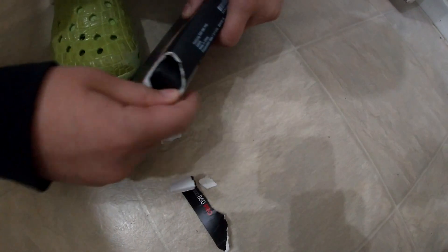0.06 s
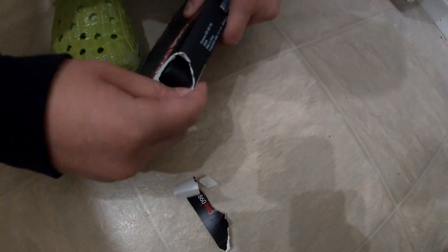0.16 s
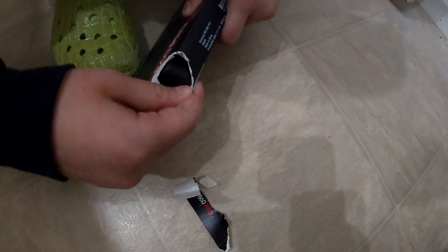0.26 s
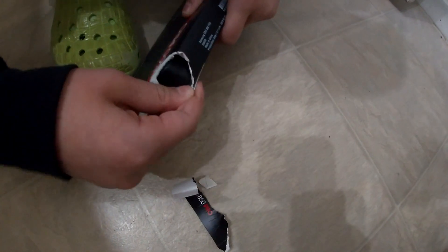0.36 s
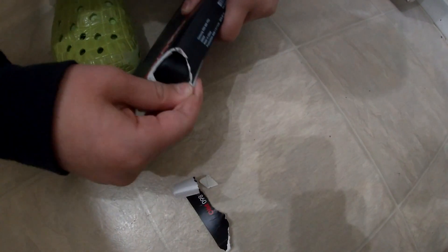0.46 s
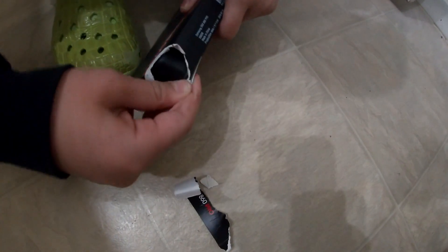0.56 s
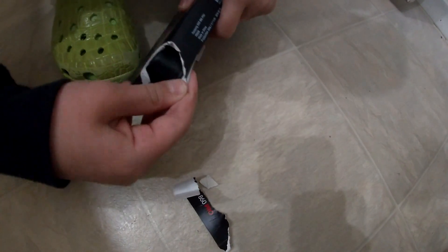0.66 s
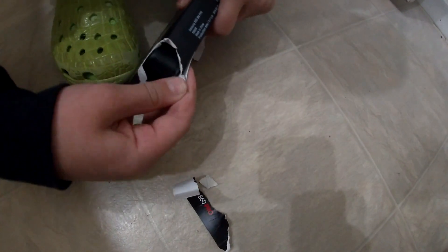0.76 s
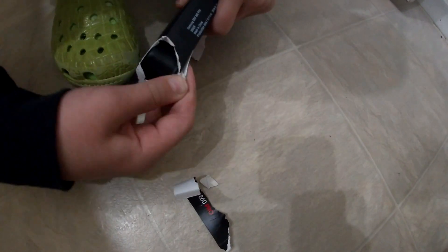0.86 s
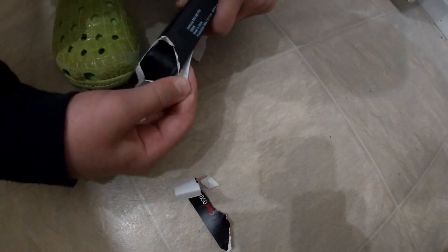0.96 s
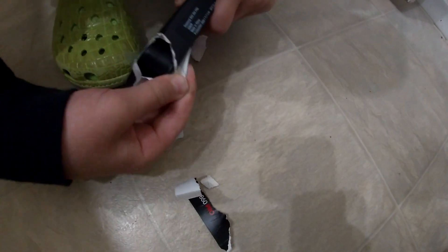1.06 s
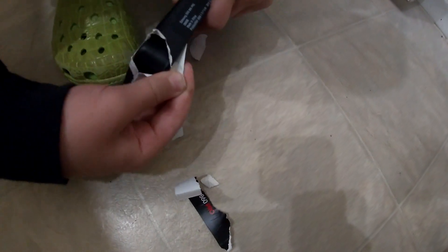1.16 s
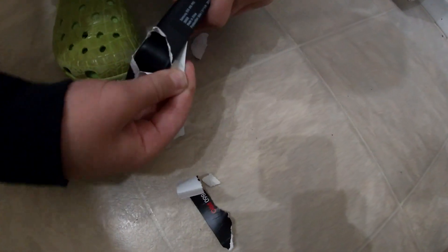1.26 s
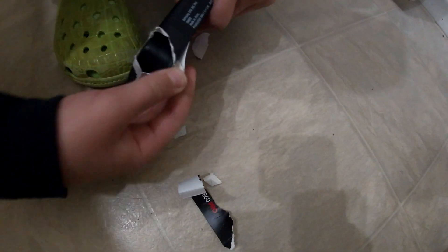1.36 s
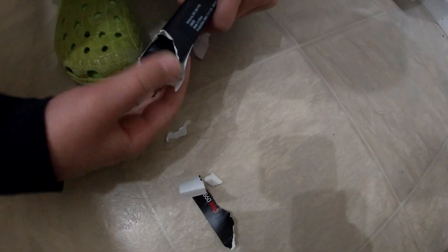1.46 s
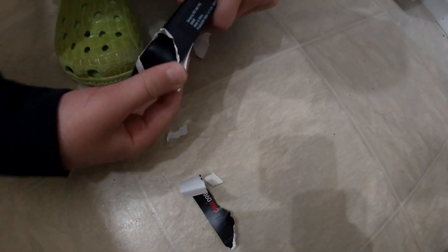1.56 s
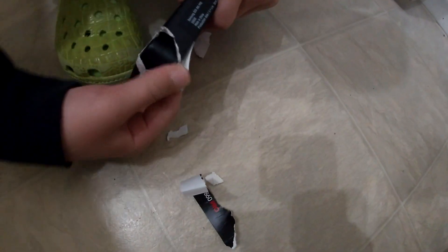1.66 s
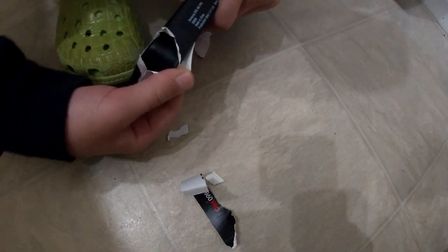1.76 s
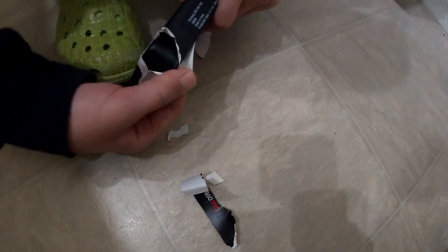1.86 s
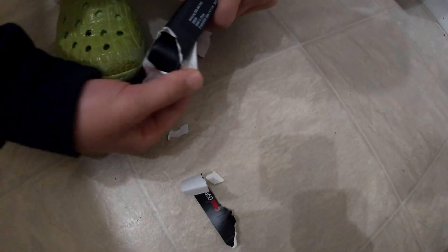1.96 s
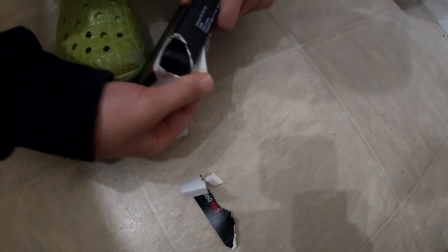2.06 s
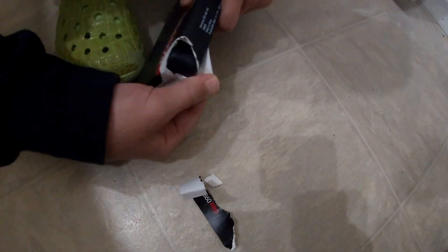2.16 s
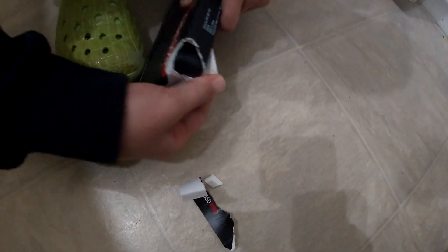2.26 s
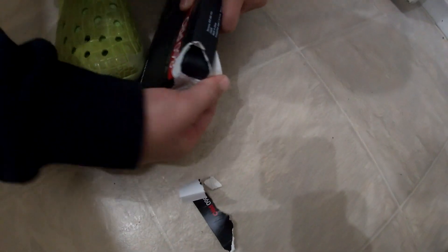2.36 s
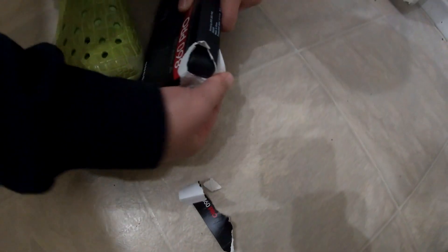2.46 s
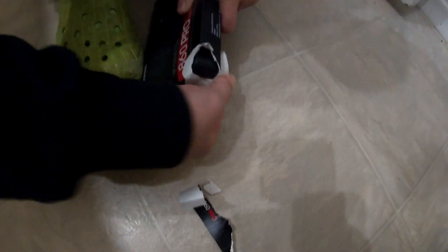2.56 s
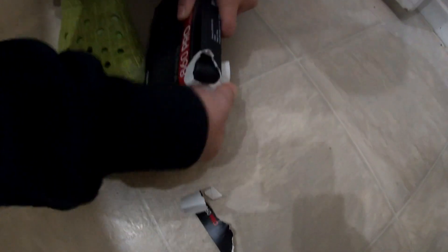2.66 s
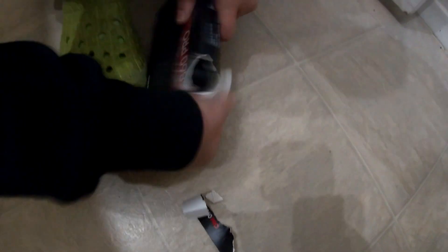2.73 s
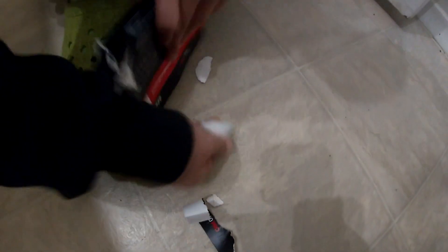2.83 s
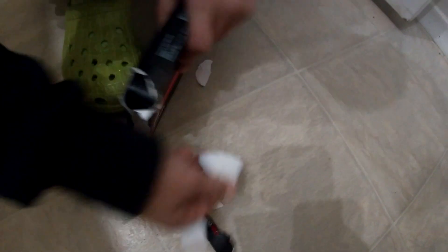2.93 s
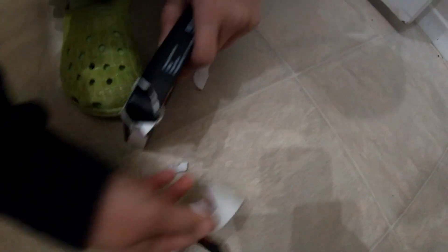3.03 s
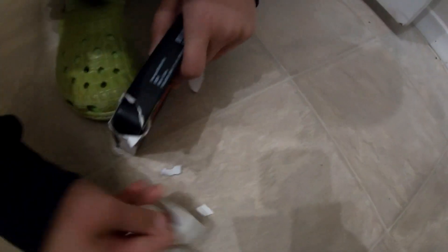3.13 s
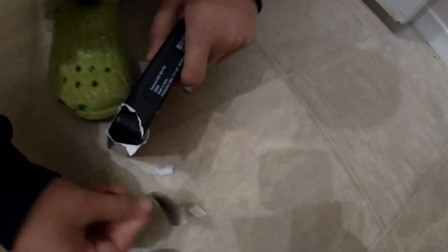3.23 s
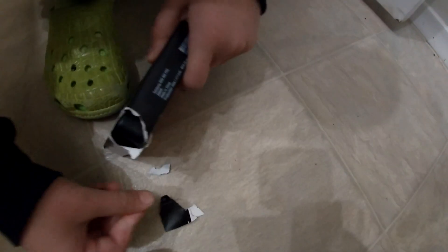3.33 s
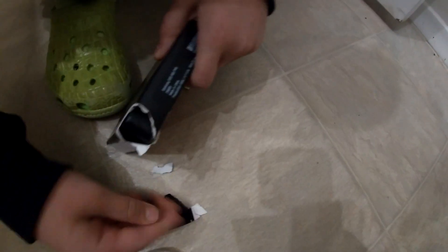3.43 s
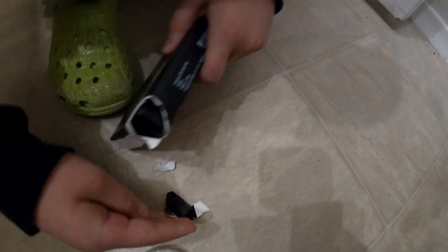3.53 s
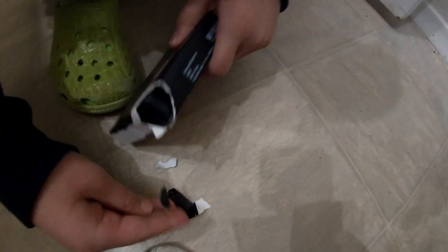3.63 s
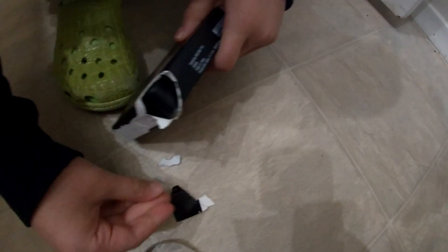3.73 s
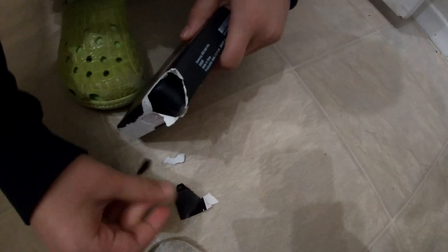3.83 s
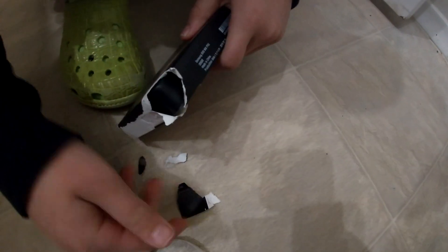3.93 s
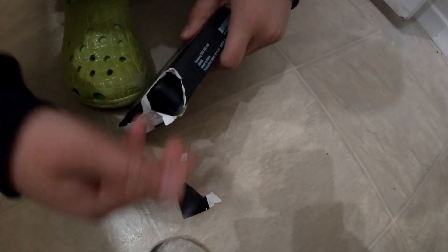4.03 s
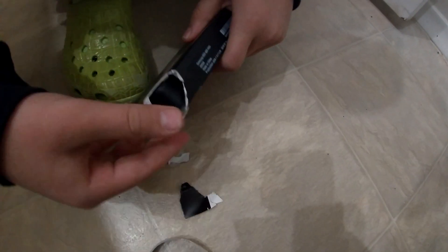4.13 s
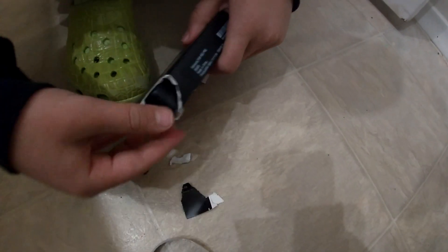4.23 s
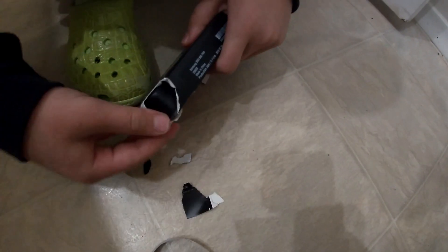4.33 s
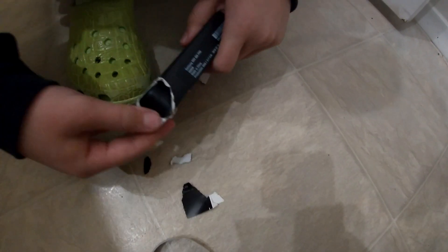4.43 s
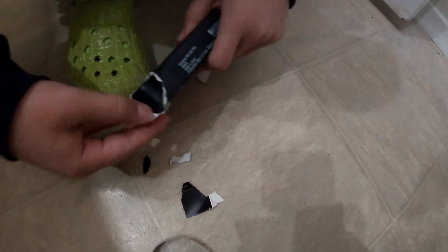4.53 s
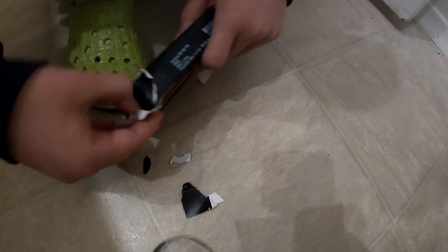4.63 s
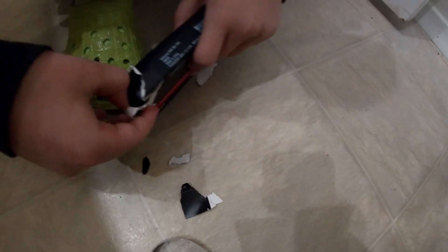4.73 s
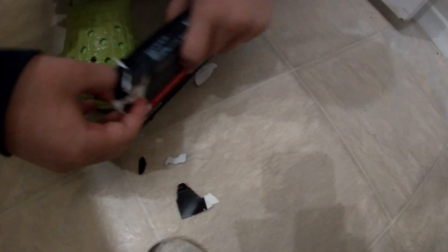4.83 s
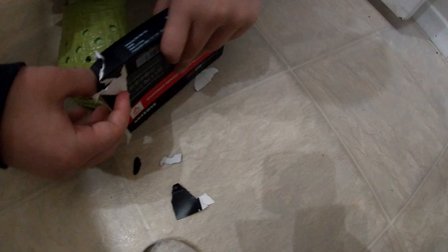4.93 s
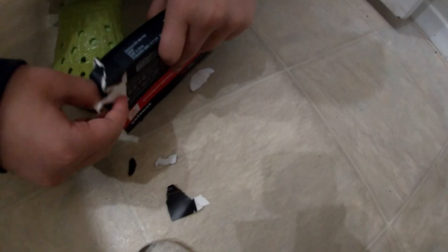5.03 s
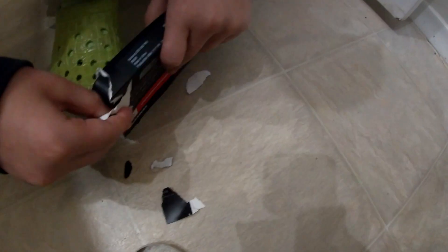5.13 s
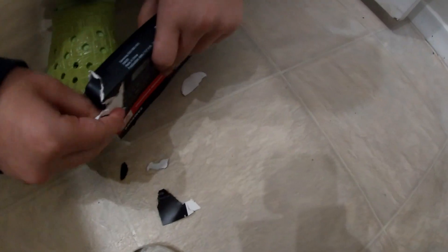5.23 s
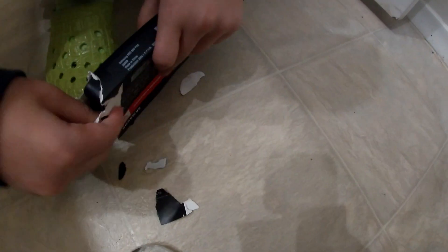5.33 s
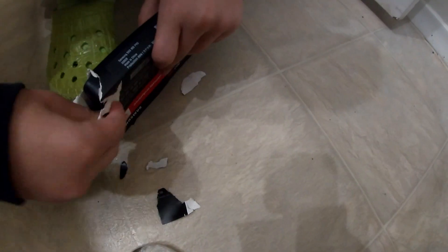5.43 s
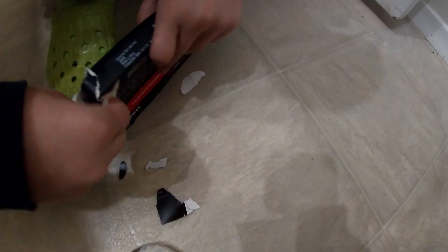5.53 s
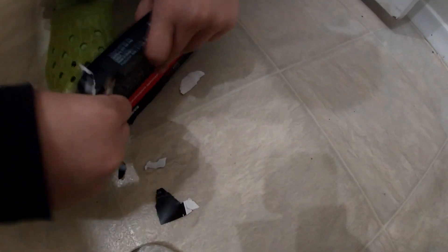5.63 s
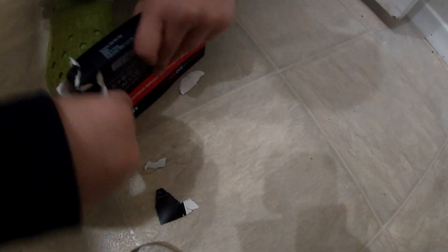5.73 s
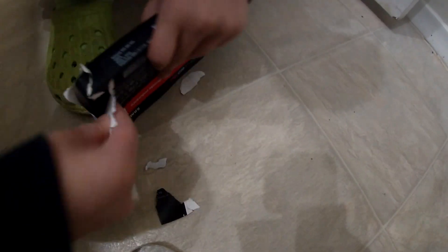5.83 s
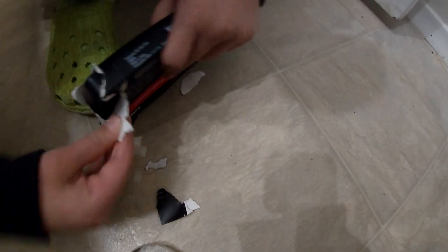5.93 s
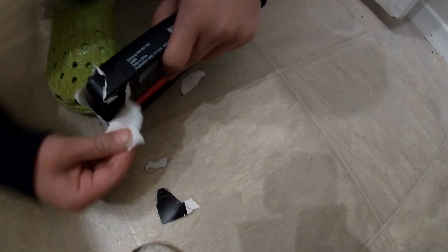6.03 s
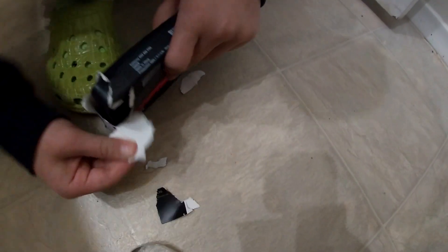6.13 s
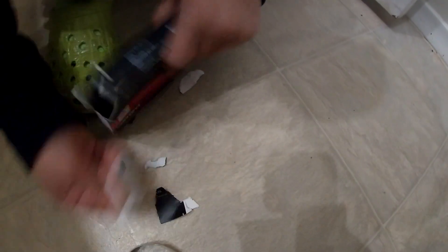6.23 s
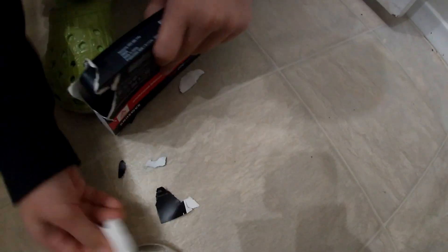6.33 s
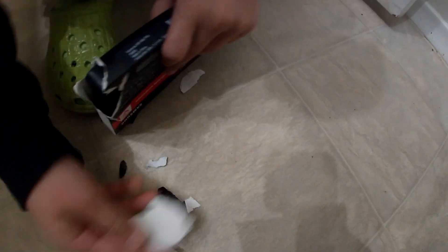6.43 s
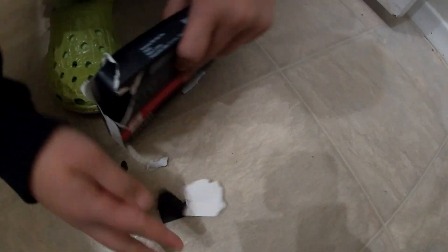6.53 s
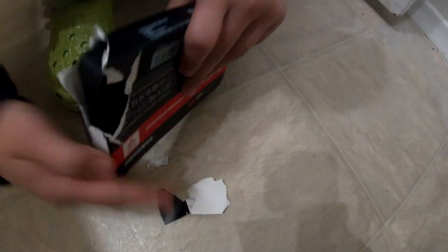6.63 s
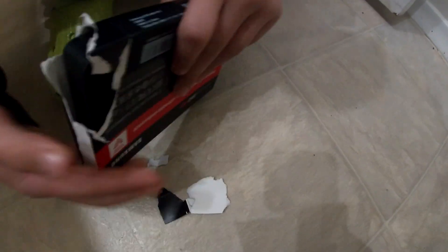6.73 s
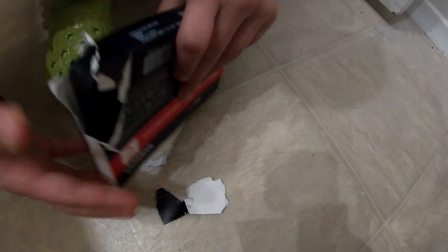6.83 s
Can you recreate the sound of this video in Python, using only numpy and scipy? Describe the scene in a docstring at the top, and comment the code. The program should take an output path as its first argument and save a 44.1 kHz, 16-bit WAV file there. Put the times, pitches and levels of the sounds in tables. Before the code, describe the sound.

Thin card is rubbed, creased, peeled and torn in uneven bursts in a small hard room, while a motor hums quietly.

```python
"""Just above the floor of a small hard room, a small cardboard box is picked open by hand.
Fingers rub the card, creases snap, strips rip, skin peels, card squeaks and scraps tap.
Random clicks, as of breaking fibres, shake the parts of the card; snaps, rips and rubbing also ring the hollow.
Squeaks are gliding tones, jolts and straining hands are low noise,
and an appliance makes two wavering hums over rumble and hiss."""
import sys
import numpy as np
from scipy import signal
from scipy.fft import rfft, irfft
from scipy.io import wavfile

SR = 44100
rng = np.random.default_rng(int(sys.argv[2]) if len(sys.argv) > 2 else 0)


def wav_record(signal):
    """Record a signal, one row per channel, as 16-bit PCM in the file named by sys.argv[1]."""
    frames = np.transpose(np.atleast_2d(signal))
    bounded = np.clip(frames, -1, 1)
    # unit amplitude maps onto the largest positive 16-bit level
    quanta = np.round(bounded * 32767).astype(np.int16)
    wavfile.write(sys.argv[1], SR, quanta)


N = 303408
TIME = np.arange(N) / SR

# The appliance's rumble and the room's hiss, as tone colours: f/Hz, relative level/dB
MACHINE_COLOUR = [(20, 2.5), (45, -6), (70, -7), (90, -12.5), (130, -9), (160, 1.5), (185, 7), (220, 0),
                  (255, -5), (300, -8), (370, -35)]
AIR_COLOUR = [(330, 3), (560, 0), (760, 15), (930, -1), (1150, -1), (2500, -5.5), (4500, -7.5),
              (7000, -1.5), (8500, -20.5), (11000, -19.5), (16000, -30)]
MACHINE_DB, AIR_DB = -57, -68
HUM_HZ, HUM_DB = 155.3, -53.5
LOW_HUM_HZ, LOW_HUM_DB = 69.4, -70

# Dull rumble of the straining grip: start t/s, length t/s, level/dB
STRAINS = [(0, 0.14, -60), (2.4, 0.91, -62), (5.07, 0.2, -41), (5.45, 0.23, -56), (6.15, 0.097, -48)]
STRAIN_ATTACK_S, STRAIN_RELEASE_S = 0.25, 0.12
# Colour of that rumble: f/Hz, relative level/dB
GRIP_COLOUR = [(15, 1), (35, -12), (65, -4), (100, -21), (170, -6), (260, -15), (450, -28)]
# Jolts of box and hands: t/s, starting level/dB, time to fall to 1/e t/s, top f/Hz
JOLTS = [(0.413, -49, 0.024, 200), (1.313, -40, 0.039, 382), (1.386, -46, 0.064, 94),
         (1.721, -48, 0.041, 217), (2.789, -20, 0.015, 330), (2.805, -29, 0.03, 276),
         (2.881, -31.5, 0.03, 145), (4.108, -45.5, 0.027, 305), (4.287, -41.5, 0.028, 314),
         (4.459, -37, .035, 35), (4.611, -47, 0.025, 50), (5.668, -30, 0.034, 323),
         (6.058, -48, 0.019, 260), (6.154, -57, 0.035, 300), (6.276, -30, 0.032, 132)]

# Strokes of fingers and card sliding on card: start t/s, length t/s, fibre breaks per s,
# crease level/dB, then hollow, wall and fibres level/dB against the crease (all before part_db)
STROKES = [(0.043, 0.18, 1550, -71, 19.5, 21, 6), (.27, 0.021, 1516, -78, 3, -3, 8),
           (0.342, 0.013, 1937, -68, 17.5, 16, 9), (.51, 0.12, 2500, -68, -4, 2.5, -1),
           (0.669, 0.028, 1497, -59.5, 6.5, 2.5, -1), (.76, 0.069, 383, -59, 0, 6.5, -3),
           (.88, 0.22, 411, -59, 7.5, 7.5, -4), (.935, 0.013, 600, -63, -3, 19.5, 5),
           (1.15, .085, 602, -61.5, 6.5, 4, -7), (1.33, 0.08, 1020, -66.5, 14.5, 12, 0),
           (1.534, 0.016, 3040, -57.5, 9, 5.5, -2.5), (1.6, 0.25, 1510, -65, 6.5, 4, -4),
           (1.96, 0.26, 464, -59.5, 11, 8.5, -0.5), (2.28, 0.32, 637, -55.5, 9.5, 8, -4.5),
           (2.63, 0.058, 600, -54.5, 6.5, 9, 2.5), (2.748, .015, 1500, -44.5, 2, -3, -2),
           (2.8, 0.0083, 1020, -55, 15, 25, 3), (2.84, 0.068, 998, -53, 11.5, 5, -2.5),
           (2.97, 0.025, 496, -69, 1, 7, 6), (3.05, 0.13, 997, -73, 6, 1, -2),
           (3.18, 0.048, 2000, -57.5, -11, 1, 2.5), (3.42, .13, 3000, -73.5, 3, 1, -2.5),
           (3.63, 0.086, 3070, -76.5, 16, 5, 1.5), (4.1, 0.027, 1500, -67.5, 11, 5, -10),
           (4.169, 0.027, 2010, -51, 7.5, 5, -4), (4.299, 0.02, 2015, -50.5, 8.5, 4, -4),
           (4.39, 0.2, 1495, -58.5, 0, 4, -5), (4.575, 0.051, 2385, -53.5, 8.5, -4, -5.5),
           (4.67, .34, 1520, -56, 9, 1, -3), (5.03, 0.057, 900, -53, 11, 10.5, -4),
           (5.1, 0.057, 700, -50, 10.5, 3, -3.5), (5.2, 0.26, 587, -64.5, 7.5, 4, -0.5),
           (5.69, 0.03, 2036, -52, 6, 11.5, -4), (5.76, 0.033, 2530, -68, 7, 1, -2),
           (5.835, .11, 2476, -55.5, 8, 3.5, -2), (5.99, 0.04, 500, -57, 14.5, 0, -6),
           (6.191, 0.052, 635, -42, 5.5, 1, 0.5), (6.411, 0.2, 1000, -70, 3, 4.5, -0.5),
           (6.575, 0.084, 1000, -61.5, -10, 2, -1.5), (6.73, .14, 1190, -70.5, -11, 3, -1)]
STROKE_ATTACK_S, STROKE_RELEASE_S = 0.037, 0.069
CRINKLES_PER_S, CRINKLE_DB = 35, -10.5   # small creases giving way; level against the fibre clicks
SLIDE_SHARE = 0.3   # smooth hiss, as a share of the fibre clicks' rms

# Colours of flap, wall, rubbed crease, broken fibres and sliding fibres: f/Hz, relative level/dB
FLAP_COLOUR = [(110, -25), (190, 0), (320, -6.5), (500, 2.5), (620, -5), (800, -12)]
WALL_COLOUR = [(850, 3), (1100, -28), (1280, 12), (1550, 9.5), (1820, 11.5), (2300, -21.5)]
CREASE_COLOUR = [(1500, -23), (1950, -11), (2280, -0.5), (2700, -3), (3400, -9.5), (4600, -47)]
FIBRE_COLOUR = [(2600, -6.5), (3700, -0.5), (5300, 0.5), (7500, -2), (8700, -8), (9800, -11), (11000, -22),
                (14000, -28.5), (16000, -39)]
SLIDE_COLOUR = [(2600, -19), (3700, 1.5), (5300, 2.5), (7500, -2), (8700, -6.5), (9800, -12.5),
                (11000, -24.5), (14000, -30), (16000, -47)]
# In a break, the air in the hollow and the crease each ring around one pitch
HOLLOW_HZ, HOLLOW_WIDTH_HZ = 865, 107
CREASE_HZ, CREASE_WIDTH_HZ = 2420, 750
CREASE_SCATTER = 0.08   # full range of the random pitch shift, as a share

# Creases snapping: t/s, time to fall to 1/e t/s, hollow f/Hz, crease level/dB over 10 ms,
# then flap, hollow, wall and fibres level/dB against the crease (all before part_db)
SNAPS = [(.039, 0.031, 886, -46, -0.5, 9, -4, -5.5), (.1072, 0.0013, 960, -40.5, -23, -2, -6, 1),
         (.1337, 0.0073, 883, -44, 4, 11.5, 0, -10), (.3846, 0.0066, 800, -54.5, -20, 19, 4, -3),
         (.3928, 0.0002, 870, -34.5, -4.5, -1, 3, -20), (.3962, .0026, 830, -39.5, -12, 13, 4, 3.5),
         (.413, 0.0022, 990, -47.5, 2, 12, -17, 11.5), (.433, 0.0033, 930, -55, 11, 17.5, -2, -12),
         (.928, 0.0021, 920, -61, -16, 16, -12, 3), (1.28, 0.0086, 910, -48.5, -10, 3, 1, -17),
         (1.2932, 0.0055, 875, -51, 1, 6, -5, -18), (1.3066, 0.0023, 970, -34, -4, 6.5, 0, -10.5),
         (1.3112, 0.005, 845, -35, 3.5, 3, 3.5, -13), (1.345, 0.0031, 810, -50.5, 3, -8, -5, 1),
         (1.3686, 0.0025, 835, -51.5, -10, 11, 10, -1), (1.402, .0033, 900, -55, -1, 13, 3, 1),
         (1.6996, 0.0062, 914, -48.5, 3, 13.5, 7.5, 1.5), (1.8201, 0.0084, 910, -51.5, 2.5, 9.5, 5, -18),
         (2.1157, 0.00094, 860, -31, -23, -3, -33, -6), (2.1182, 0.0014, 930, -44.5, -21, 28.5, 9.5, 1.5),
         (2.4796, 0.0026, 980, -46.5, -28, -18, -18, 4.5), (2.4978, 0.0027, 960, -46.5, -31, -22, -22, 6.5),
         (2.5498, 0.0047, 890, -24.5, -25, -12.5, -17, -5.5),
         (2.566, 0.013, 890, -31.5, -16, -6, -20.5, -5), (2.578, .004, 815, -40.5, -30.5, -15.5, -26, -10),
         (2.591, 0.0031, 790, -32, -13, -3, -29, -11), (2.6, 0.0029, 855, -40.5, -29, -7.5, -13, 6),
         (2.6052, 0.0016, 800, -22.5, -18, -12, -34, -8.5),
         (2.6092, 0.00037, 863, -21, -10, -6.5, -21, -17), (2.8947, 0.012, 846, -38.5, -1, 3, 0, 0.5),
         (4.0828, 0.0022, 815, -62, -20, 19.5, 2, 0), (4.2902, 0.002, 840, -42, -14, -9, 2.5, -26),
         (4.448, .0021, 830, -47, 0, 15.5, -16, -11), (4.4884, 0.0032, 837, -44.5, 7.5, 15.5, 4, 5.5),
         (4.8891, 0.0019, 970, -55, 3, 13, 11, 10), (4.911, 0.0095, 1064, -38.5, -9, 2, -16, -7),
         (4.9232, 0.0036, 893, -30, -22, 12, -0.5, -0.5), (5.0952, 0.00057, 920, -38, 7, 8.5, -15, -15),
         (5.1257, 0.00062, 870, -48.5, 12.5, 18.5, -7, 5.5), (5.1709, .0017, 840, -47.5, 10.5, 13, -1, -1),
         (5.1861, 0.0025, 870, -46.5, -6, 14.5, 4, 3), (5.2089, 0.00098, 895, -47, 7, 11, -14, -6),
         (5.2372, 0.001, 925, -46.5, 6, 9.5, 4.5, 0), (5.2578, 0.0087, 970, -50.5, -11, 11, 3, 4.5),
         (5.3352, 0.0018, 980, -53, 3, 3, -5, 1), (5.4822, 0.0028, 820, -22, -57, 0, -2, -5),
         (5.5535, 0.0011, 1010, -22.5, -12.5, -12, -3.5, -4), (5.6511, .015, 900, -39.5, -11, -15, -22, -7),
         (5.665, 0.0024, 935, -28.5, 7.5, 11, -24, 3.5), (5.67, 0.0037, 875, -36.5, -1, -7, 9, 9.5),
         (6.0351, 0.015, 850, -44.5, -4, 4, -11, 4.5), (6.0549, 0.0028, 890, -31.5, -30, 7.5, -3, -3),
         (6.089, 0.00071, 930, -42, 5, -17, -17, 3), (6.132, 0.013, 855, -32.5, -5, 1, -15, 3),
         (6.1396, 0.00022, 860, -40.5, 8, 12, -16, 4.5), (6.1544, 0.006, 823, -30, 3, 6, -16, -4.5),
         (6.177, 0.0098, 850, -33, 4.5, -7, -17, -3), (6.1909, 0.0021, 860, -38.5, -2, -17, -18, 4.5),
         (6.2703, 0.0023, 884, -32.5, 4.5, 8.5, -5, -16)]
# Fast runs of the tear, same columns as SNAPS
RIPS = [(1.42, 0.02, 890, -42.5, -1, 5, 0.5, -2), (2.756, 0.026, 866, -27.5, 1, 12, -17, 6),
        (2.77, 0.022, 880, -19.5, -17, -20, -1, -6.5), (2.782, 0.0087, 854, -24, -12, 0.5, -0.5, -13),
        (6.0605, 0.015, 880, -27, -8, -4.5, -3.5, 0.5), (6.144, 0.016, 902, -37.5, 2, 15.5, -15, 2),
        (6.229, 0.0042, 830, -33, -2, 1.5, -6, 3.5), (6.2372, .022, 910, -29.5, 4, 1.5, 1, 3.5)]
FRACTURE_SPREAD_DB = 3.0

# Pulls that lift the printed skin off the card: start t/s, length t/s, level/dB
PULLS = [(.78, 0.033, -56), (.925, .135, -50.5), (1.14, 0.06, -52), (1.21, 0.042, -51.5), (1.885, .03, -57),
         (1.96, 0.1, -57.5), (2.18, .18, -69), (2.44, .09, -53), (2.57, 0.067, -47)]
PULL_ATTACK_S, PULL_RELEASE_S, PARTINGS_PER_S = 0.035, 0.04, 800
# Sharp pops of that skin: t/s, time to fall to 1/e t/s, level/dB over 10 ms
POPS = [(0.876, 0.0032, -49), (1.017, 0.0052, -48), (1.132, 0.012, -45.5), (1.219, 0.0033, -41),
        (1.256, 0.00088, -50.5), (1.789, .0026, -54), (1.842, 0.0013, -48.5), (1.8993, 0.0016, -41),
        (1.924, 0.00063, -28.5), (1.9706, 0.002, -37.5), (2.01, 0.0016, -43.5), (2.024, .003, -44.5),
        (2.206, 0.0017, -53.5), (2.246, 0.0032, -45), (2.337, .002, -48), (2.3637, 0.00071, -38.5)]
# Colour of the skin: f/Hz, relative level/dB
SKIN_COLOUR = [(1200, -10.5), (3000, -12), (4600, -5), (6100, 0.5), (7300, 0), (8600, -5.5), (10500, -14),
               (12500, -18), (14500, -29.5), (16000, -35)]

# Card squeaking on card: start t/s, end t/s, start f/Hz, end f/Hz, level/dB before swell and flutter
SQUEAKS = [(1.316, 1.348, 2040, 1820, -63), (1.41, 1.453, 2513, 3070, -49), (2.811, 2.895, 1720, 1610, -49),
           (3.442, 3.574, 4570, 5000, -75), (5.479, 5.555, 1747, 1695, -38.5),
           (5.548, 5.646, 1322, 1167, -47)]

# Light touches of loose scraps and fingers: t/s, time to fall to 1/e t/s,
# base level/dB over 10 ms, fibres level/dB against that (both before the part trims)
SCRAPS = [(3.1553, 0.0044, -41, 4.5), (3.323, 0.0018, -48.5, -24), (3.344, .0071, -48.5, -5.5),
          (3.792, .0043, -67, 10.5), (3.815, .0034, -60, 5.5), (6.543, 0.0048, -43, -11.5),
          (6.5646, 0.0018, -53.5, 15), (6.602, .0051, -50, 5), (6.667, 0.0097, -56, -2.5),
          (6.721, 0.0054, -39, -12.5), (6.817, 0.005, -51, -2)]
# A light touch hardly stirs flap and hollow: trim level/dB of flap, hollow, wall, crease, fibres
SCRAP_PARTS_DB = [-12, -12, -6.5, -11, 0.5]

# How long the room rings: f/Hz, time to fall by 60 dB t/s
ROOM_T60 = [(150, 0.094), (900, 0.3), (2500, 0.23), (7000, 0.25), (14000, 0.073)]
SIDE_TOP_HZ, CUTOFF_HZ = 11800, 15900


def from_db(db):
    """Turn decibels into a plain gain."""
    return 10 ** (np.asarray(db) / 20)


def rms_one(x):
    """Scale a sound to an rms of 1."""
    return x / np.sqrt(np.mean(x ** 2) + 1e-20)


def at_hz(points, hz):
    """Read a frequency table between its points, on a log-frequency axis."""
    f, value = np.transpose(points)
    return np.interp(np.log(hz), np.log(f), value)


def drift(rate):
    """Wander between random knots of spread 1, rate per second; hold still once all knots are used."""
    knots = rng.standard_normal(2048)
    return np.interp(TIME * rate, np.arange(len(knots)), knots)


def response(colour, size=2048):
    """Make the minimum-phase click of a colour: a sound that never starts before its push."""
    hz = np.maximum(np.fft.rfftfreq(size, 1 / SR), 5)
    octaves_beyond = np.abs(np.log2(hz / np.clip(hz, colour[0][0], colour[-1][0])))
    db = np.maximum(at_hz(colour, hz) - 24 * octaves_beyond, -80)
    # folding the cepstrum forward in time gives the minimum phase
    cepstrum = irfft(np.log(from_db(db)))
    cepstrum[1:size // 2] *= 2
    cepstrum[size // 2 + 1:] = 0
    return irfft(np.exp(rfft(cepstrum)))


def through(x, impulse):
    """Let a sound set off an impulse response, keeping its length."""
    return signal.fftconvolve(x, impulse)[:len(x)]


def band_pass(x, low, high):
    """Keep what lies between two frequencies."""
    return signal.sosfilt(signal.butter(2, [low, high], "band", fs=SR, output="sos"), x)


def noise(colour):
    """Steady coloured noise with an rms of 1."""
    return rms_one(through(rng.standard_normal(N), response(colour, size=16384)))


def add(out, s, sound):
    """Mix a short sound in at s seconds."""
    i = max(int(s * SR), 0)
    out[i:i + len(sound)] += sound[:N - i]


def swell(start, length, attack, release):
    """A movement of the hand eases in, holds and eases out."""
    corners = np.cumsum([start - attack, attack, length, release])
    return np.interp(TIME, corners, [0, 1, 1, 0]) ** 2


def swells(table, attack, release):
    """Summed gain of a table of movements."""
    return sum(from_db(db) * swell(start, length, attack, release) for start, length, db in table)


def at_level(sound, db):
    """Give a short sound the energy of 10 ms at this rms level."""
    return from_db(db) * sound / np.sqrt(np.sum(sound ** 2) / (0.01 * SR))


def background(waver_db, wander_hz):
    """A motor's two wavering tones over its rumble and the hiss of the room."""
    out = from_db(MACHINE_DB) * noise(MACHINE_COLOUR)
    out += from_db(AIR_DB) * noise(AIR_COLOUR)
    for hz, db in (HUM_HZ, HUM_DB), (LOW_HUM_HZ, LOW_HUM_DB):
        phase = 2 * np.pi * np.cumsum(hz + wander_hz * drift(3.4)) / SR
        gain = from_db(db + waver_db * drift(33))
        out += gain * np.sqrt(2) * np.sin(phase)
    return out


def jolts(size=16384):
    """The box recoils in soft thuds of fading low noise; the straining grip rumbles in swells."""
    out, t = np.zeros(N), np.arange(size) / SR
    for s, db, decay, top_hz in JOLTS:
        thud = band_pass(rng.standard_normal(size), top_hz / 7, top_hz)
        fade = np.exp(-t / decay)
        add(out, s, from_db(db) * rms_one(thud * fade) * np.sqrt(np.mean(fade ** 2)))
    return out + swells(STRAINS, STRAIN_ATTACK_S, STRAIN_RELEASE_S) * noise(GRIP_COLOUR)


def fractures(per_s, spread_db, size):
    """Fibres break at random: many small clicks, a few large."""
    chance, strength, sign = rng.random((3, size))
    sizes = from_db(spread_db * np.minimum(-np.log(1 - strength), 4))
    return (chance < per_s / SR) * sizes * np.sign(sign - 0.5)


def resonance(hz, width_hz, size=2048):
    """A well-damped ringing of the box around one pitch, with steep skirts."""
    t = np.arange(size) / SR
    ring = np.exp(-np.pi * width_hz * t) * np.sin(2 * np.pi * hz * t)
    return band_pass(ring, hz / 1.383, hz * 1.356)


def rubbing(spread_db, catch_db, part_db):
    """Card slides in uneven catches: fibre clicks and crinkles over a smooth hiss shake five parts."""
    middles = [start + length / 2 for start, length, *_ in STROKES]
    per_s = np.interp(TIME, middles, [row[2] for row in STROKES])
    clicks = rms_one(fractures(per_s, spread_db, N) / np.sqrt(per_s))
    crinkles = from_db(CRINKLE_DB) * rms_one(fractures(CRINKLES_PER_S, spread_db, N))
    hiss = SLIDE_SHARE * rng.standard_normal(N)
    push = (clicks + crinkles + hiss) * from_db(catch_db * drift(110))
    parts = (response(FLAP_COLOUR), resonance(HOLLOW_HZ, width_hz=270), response(WALL_COLOUR),
             response(CREASE_COLOUR), response(SLIDE_COLOUR))
    shapes, levels = [], []
    for start, length, _, db, hollow, wall, fibre in STROKES:
        shapes.append(swell(start, length, STROKE_ATTACK_S, STROKE_RELEASE_S))
        # the flap moves halfway between crease and hollow
        levels.append(db + np.array([hollow / 2, hollow, wall, 0, fibre]) + part_db)
    gains = from_db(levels).T @ np.array(shapes)
    return sum(gain * rms_one(through(push, part)) for gain, part in zip(gains, parts))


def avalanche(length, per_s, hold, lead, size=3072):
    """One fracture sets off a dying run of others; a higher hold squares off the run's fading."""
    t = np.arange(size) / SR
    fade = np.exp(-(t / max(length, 1e-4)) ** hold)
    push = fractures(per_s, FRACTURE_SPREAD_DB, size) * fade
    push[0] += lead * np.sqrt(np.sum(push ** 2)) + 1e-6
    return push


def bounces(strength, count=6, size=256):
    """The sound of a break bounces off box and floor within a few ms, by other paths each time."""
    delay, sign = rng.random((2, count))
    impulse = np.zeros(size)
    impulse[0] = 1
    places = ((0.0003 + 0.0035 * delay) * SR).astype(int)
    impulse[places] = strength * np.sign(sign - 0.5)
    return impulse


def shake(push, hollow_hz, levels, kick):
    """A break shakes all five parts, and its sudden flex can also kick the air in the hollow."""
    # the crease's pitch shifts with the place of the tear
    crease_hz = CREASE_HZ * (1 + CREASE_SCATTER * (rng.random() - 0.5))
    crease = resonance(crease_hz, CREASE_WIDTH_HZ)
    crack = through(response(FIBRE_COLOUR), bounces(strength=0.24))
    puff = push + kick * np.sqrt(np.sum(push ** 2)) * signal.unit_impulse(len(push))
    parts = (through(push, response(FLAP_COLOUR)),
             through(puff, resonance(hollow_hz, HOLLOW_WIDTH_HZ)),
             through(push, response(WALL_COLOUR)),
             through(push, crease),
             through(push, crack))
    return sum(at_level(part, db) for part, db in zip(parts, levels))


def breaks(table, per_s, hold, lead, kick, part_db):
    """Each snap or rip is a run of fractures that shakes the box."""
    out = np.zeros(N)
    for s, length, hollow_hz, db, flap, hollow, wall, fibre in table:
        levels = db + np.array([flap, hollow, wall, 0, fibre]) + part_db
        push = avalanche(length, per_s, hold, lead)
        add(out, s, shake(push, hollow_hz, levels, kick))
    return out


def peeling(spread_db, catch_db):
    """The thin skin lifts fibre by fibre in bright ticks, now and then with a pop."""
    skin = response(SKIN_COLOUR)
    ticks = fractures(PARTINGS_PER_S, spread_db, N) * from_db(catch_db * drift(90))
    out = swells(PULLS, PULL_ATTACK_S, PULL_RELEASE_S) * rms_one(through(ticks, skin))
    for s, length, pop_db in POPS:
        push = avalanche(length, per_s=26000, hold=0.46, lead=0.43)
        pop = through(through(push, skin), bounces(strength=0.3))
        add(out, s, at_level(pop, pop_db))
    return out


def squeaks(waver, flutter_db):
    """Stick and slip make a rough, gliding tone that swells and fades."""
    out = np.zeros(N)
    pitch = 1 + waver * drift(400)
    flutter = from_db(flutter_db * drift(120))
    for start, end, start_hz, end_hz, db in SQUEAKS:
        at = np.flatnonzero((TIME > start) & (TIME < end))
        along = np.linspace(0, 1, len(at))
        hz = (start_hz + (end_hz - start_hz) * along) * pitch[at]
        gain = from_db(db) * flutter[at] * np.sqrt(8 * along * (1 - along))
        out[at] += gain * np.sin(2 * np.pi * np.cumsum(hz) / SR)
    return out


def scraps(per_s, hold, lead):
    """Loose bits of card tap and skid: short runs of fractures with no kick to the hollow."""
    out = np.zeros(N)
    for s, length, db, fibre in SCRAPS:
        levels = db + np.array([0, 0, 0, 0, fibre]) + SCRAP_PARTS_DB
        push = avalanche(length, per_s, hold, lead)
        add(out, s, shake(push, HOLLOW_HZ, levels, kick=0))
    return out


def room(x, wet_db, gap_s, size=24000):
    """Scattered reflections build up after a short gap, then each band fades at its own rate."""
    t, edges = np.arange(size) / SR, np.geomspace(70, 18000, 9)
    tail = np.zeros(size)
    for low, high in zip(edges, edges[1:]):
        band = band_pass(rng.standard_normal(size), low, high)
        fade = from_db(-60 * t / at_hz(ROOM_T60, np.sqrt(low * high)))
        band *= fade * (1 - np.exp(-(t / gap_s) ** 2))
        # energy in proportion to the band's width
        tail += band * np.sqrt((high - low) / (SR / 2) / np.sum(band ** 2))
    return from_db(wet_db) * through(x, tail)


def scene():
    """The card sounds share one room; left and right are nearly the same, with a little added width."""
    # part_db trims flap, hollow, wall, crease and fibres, in dB
    card = rubbing(spread_db=1.5, catch_db=2.0, part_db=[-6, -1.8, -5.0, 1.8, 4.06])
    card += breaks(SNAPS, per_s=8000, hold=1.0, lead=0.38, kick=0.46,
                   part_db=[-2.6, -1.5, -0.99, -0.81, -0.3])
    card += breaks(RIPS, per_s=3300, hold=4.5, lead=0.1, kick=0.12,
                   part_db=[-1.0, -0.8, -0.4, -0.1, 0.35])
    card += peeling(spread_db=5.5, catch_db=2.0)
    card += squeaks(waver=0.055, flutter_db=5.0)
    card += scraps(per_s=5900, hold=0.9, lead=0.4)
    mid = card + room(card, wet_db=-10.5, gap_s=0.00502)
    mid += jolts() + background(waver_db=0.9, wander_hz=1.46)
    # a faint reverb of the card, mostly its top treble, is added with opposite sign left and right
    high_pass = signal.butter(10, SIDE_TOP_HZ, "high", fs=SR, output="sos")
    top = signal.sosfilt(high_pass, card)
    slope = np.diff(card, prepend=0)
    side = room(slope, wet_db=-47, gap_s=0.003) + room(top, wet_db=-4.0, gap_s=0.003)
    return np.array([mid + side, mid - side])


def record(dry):
    """A steep low-pass cuts off the top treble."""
    return signal.sosfilt(signal.ellip(10, 0.1, 80, CUTOFF_HZ, fs=SR, output="sos"), dry)


dry = scene()
out = record(dry)
wav_record(out)
```